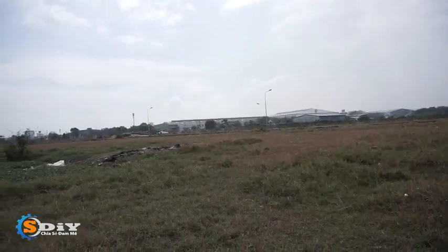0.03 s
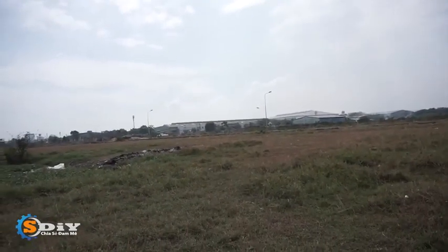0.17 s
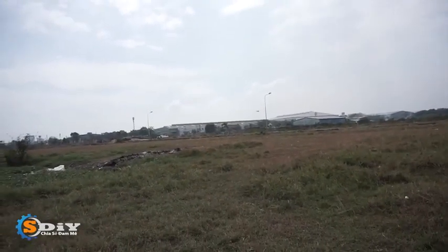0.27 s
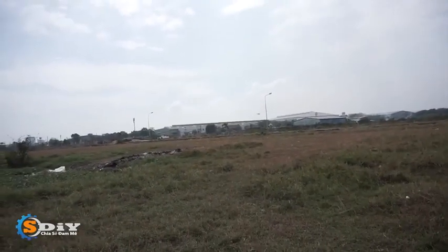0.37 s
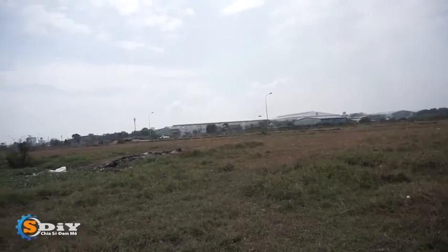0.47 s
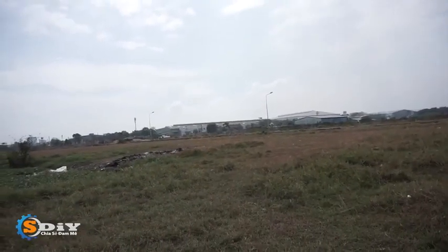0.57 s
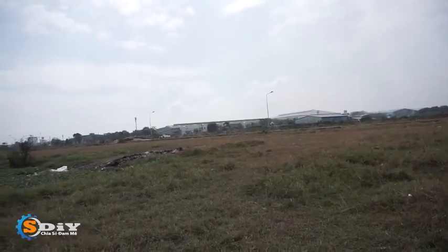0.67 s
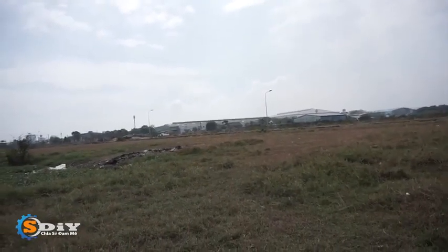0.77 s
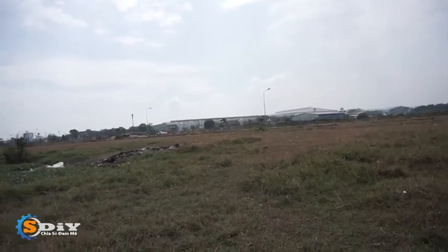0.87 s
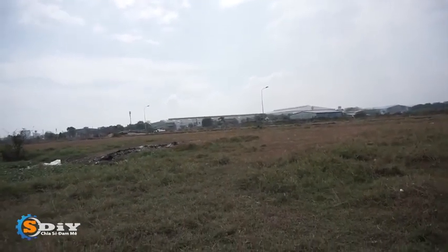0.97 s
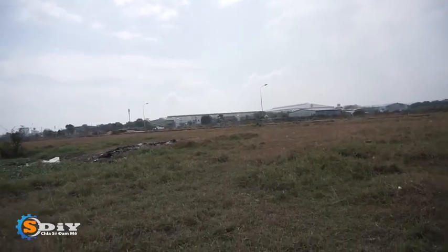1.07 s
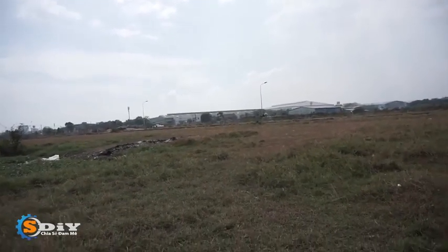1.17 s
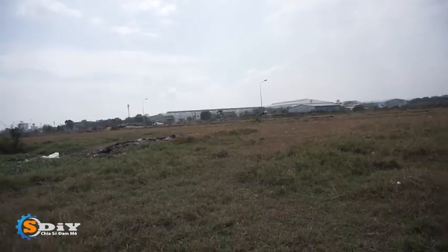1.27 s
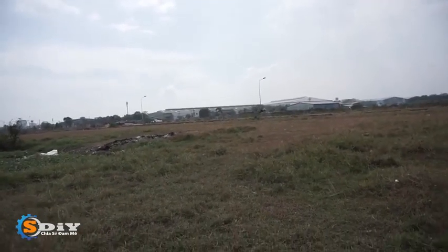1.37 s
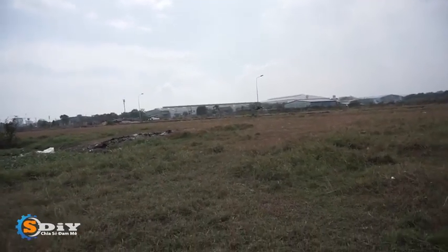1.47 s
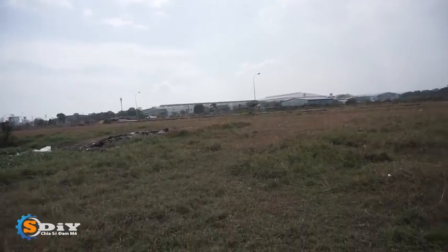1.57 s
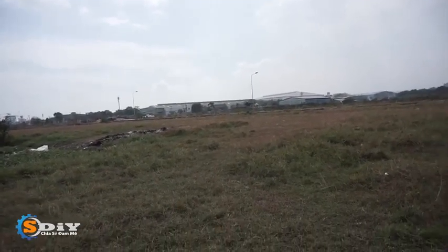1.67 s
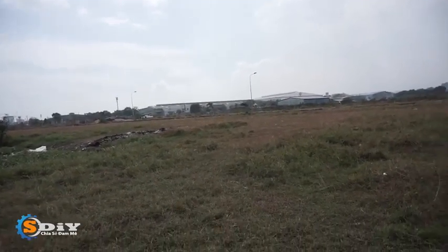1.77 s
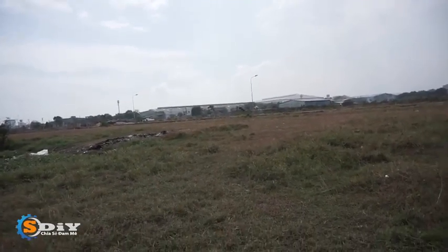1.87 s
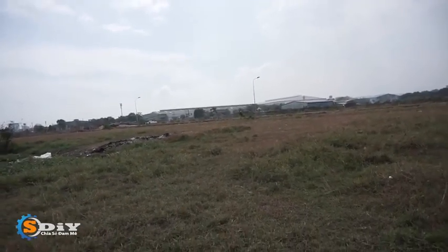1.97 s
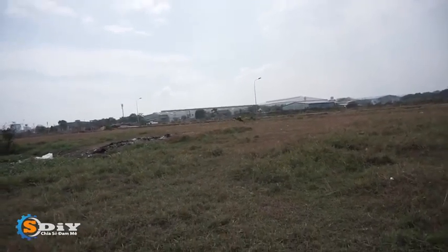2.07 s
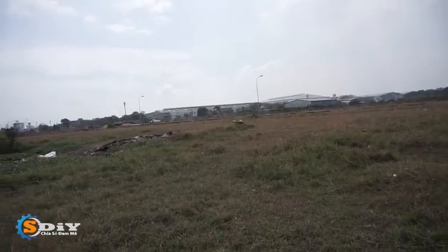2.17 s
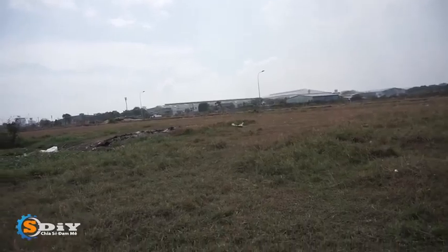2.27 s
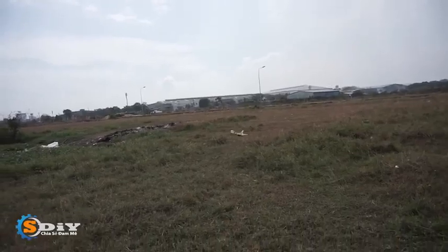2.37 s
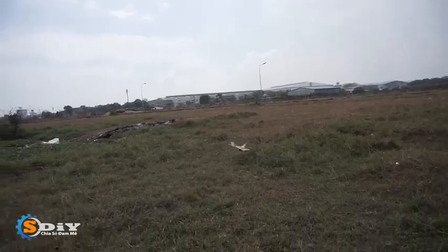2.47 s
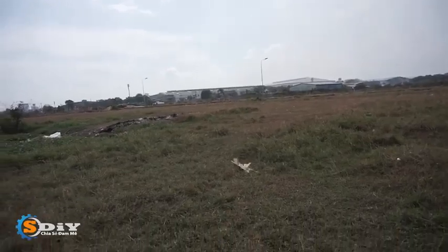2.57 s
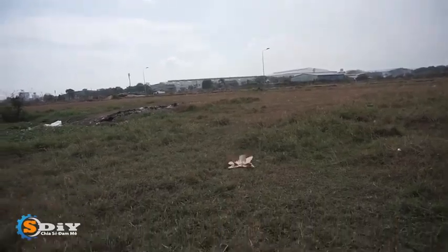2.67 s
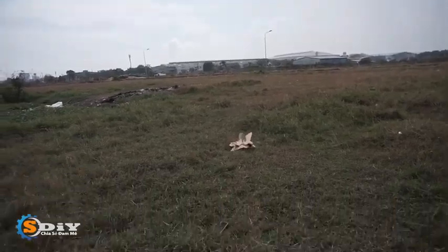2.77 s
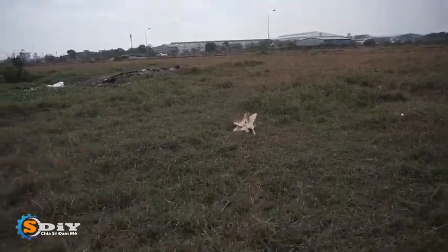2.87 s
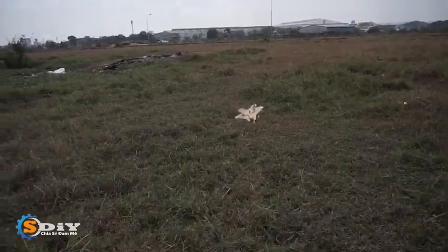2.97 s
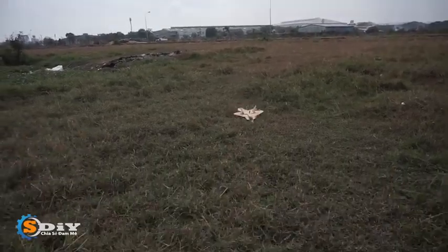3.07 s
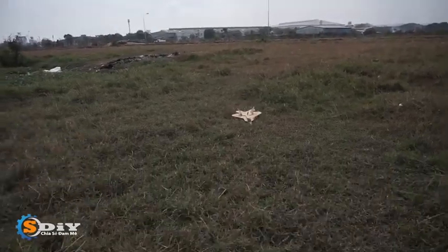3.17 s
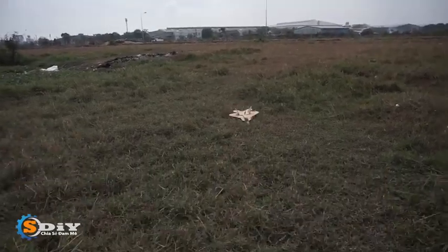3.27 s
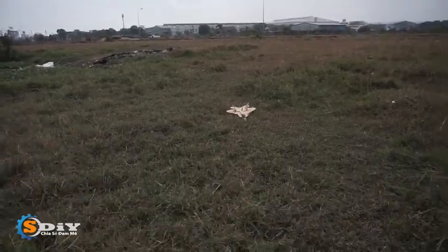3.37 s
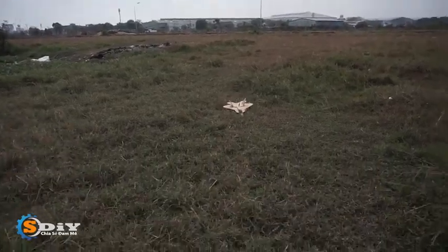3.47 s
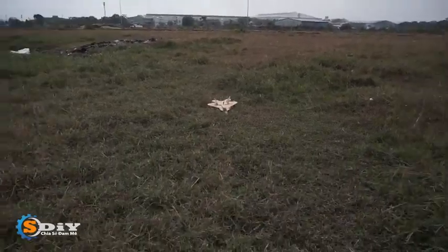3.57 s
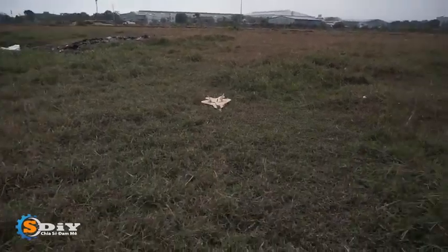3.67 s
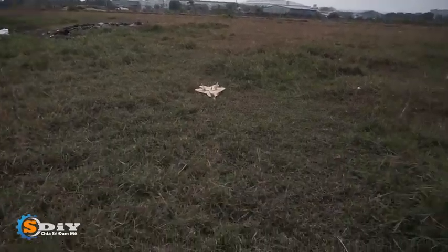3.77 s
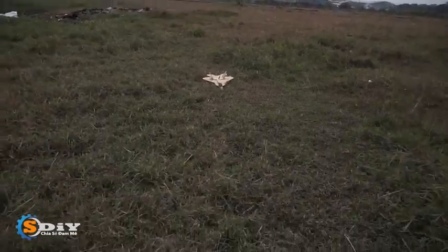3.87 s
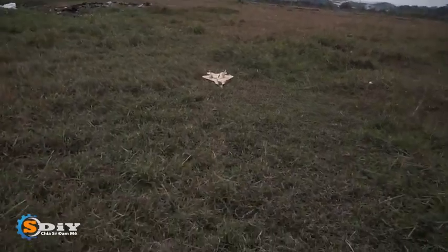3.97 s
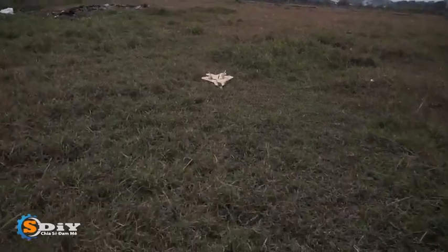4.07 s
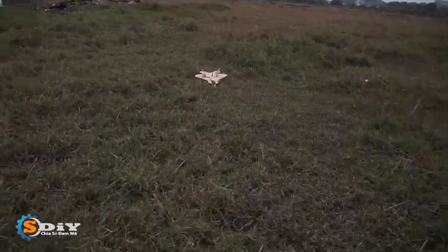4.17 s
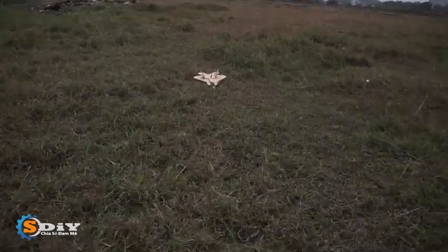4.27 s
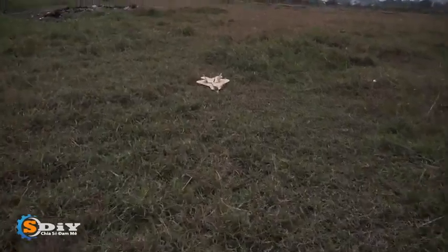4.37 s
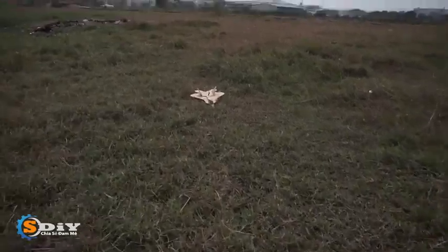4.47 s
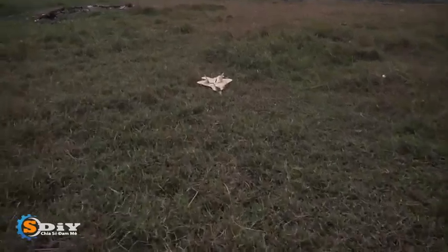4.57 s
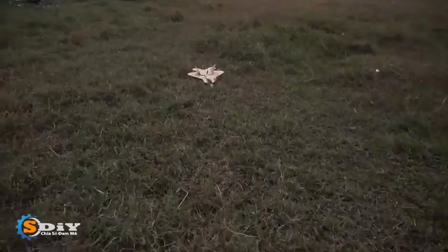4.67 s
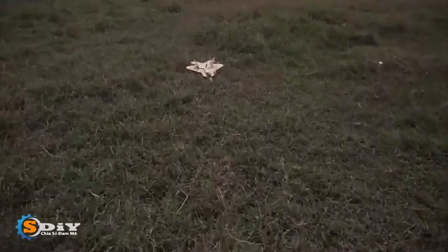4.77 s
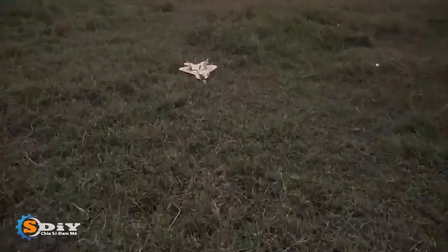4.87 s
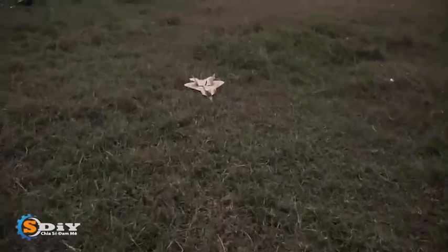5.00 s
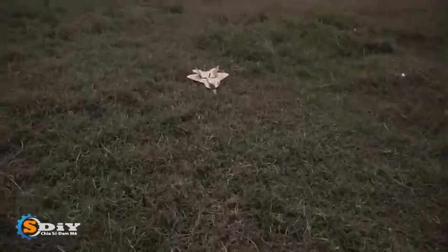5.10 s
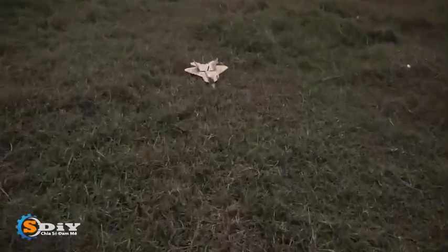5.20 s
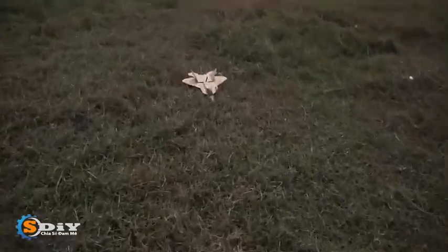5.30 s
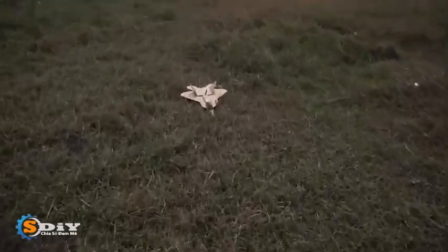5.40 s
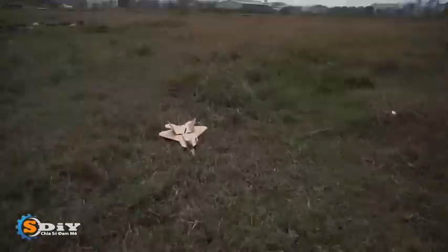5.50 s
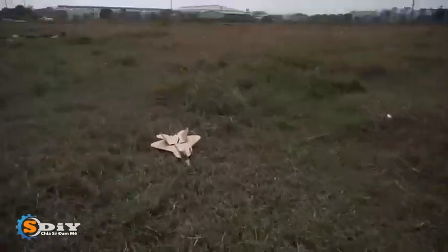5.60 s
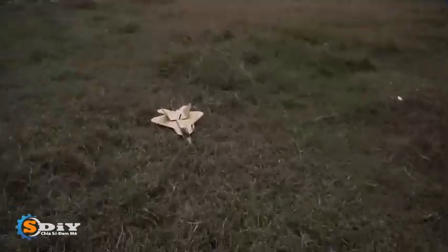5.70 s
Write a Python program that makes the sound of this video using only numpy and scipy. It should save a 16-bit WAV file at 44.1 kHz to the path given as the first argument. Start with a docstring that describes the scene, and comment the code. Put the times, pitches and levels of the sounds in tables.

```python
"""Open field with dry grass, stereo microphone: a faint background rush, a bush cricket buzzing in phrases to the left.
A small electric plane gives a burst of throttle (blade-pass harmonics over chopped noise), then glides in with a
falling whine. It skids into the grass (gated noise) with hollow knocks (struck resonances) and snapping stalks
(bright bursts). Someone then walks through the grass: swishes and treads of noise made of tiny cracks."""
import sys
import numpy as np
from scipy import signal
from scipy.fft import rfft, irfft, next_fast_len
from scipy.io import wavfile
from scipy.ndimage import map_coordinates

SR = 44100
rng = np.random.default_rng(int(sys.argv[2]) if len(sys.argv) > 2 else 0)


def master(y):
    """Save y as 16-bit WAV."""
    cut = np.clip(np.atleast_2d(y).T, -1, 1)
    pcm = np.round(cut * 32767)  # scale
    wavfile.write(sys.argv[1], SR, pcm.astype(np.int16))


N = 253134
T = np.arange(N) / SR  # time in seconds

# Colour of the open-air rush. Each row: frequency in Hz, relative level in dB.
AIR_COLOUR = [(15, -63), (25, -25), (120, -9.5), (200, -7.5), (256, -7), (335, -4), (463, -3), (591, 0),
              (1330, -4), (2220, -5.5), (2480, -5), (2690, -6.5), (10700, -13.5), (14000, -16.5),
              (16000, -21.5)]
# How alike the rush is in the two channels. Each row: frequency in Hz, likeness from -1 to 1.
AIR_ALIKE = [(60, 0.75), (150, 0.93), (380, -0.019), (950, -0.42), (2380, -0.095), (5980, -0.43),
             (15000, 0.37)]
# Cricket phrases. Each row: end in seconds, full level in dB, rasp relative to tone in dB, left over right in dB.
PHRASES = [(0.224, -45.5, -3.5, 8), (0.865, -44, -6.5, 7.5), (1.525, -42.5, -8, 7), (2.181, -42.5, -10, 7),
           (2.86, -41.5, -11, 10), (3.486, -37, -19, 17), (4.175, -38.5, -15, 16), (4.757, -48.5, -5, 7)]
# Colour of the cricket's rasp. Each row: frequency in Hz, relative level in dB.
RASP_COLOUR = [(9000, -63), (10000, -2), (10400, 13), (11200, 6), (11600, 6), (12800, -40)]
RASP_ALIKE = [(10000, 0.35)]  # Each row: frequency in Hz, likeness.
# The speed controller's switching tone.
# Each row: time in seconds, level in dB before SWITCHING_LIFT_DB is added.
SWITCHING = [(0.6, -78), (0.65, -61), (0.904, -41), (1.16, -55), (1.33, -40.5), (1.73, -66), (1.822, -53),
             (1.912, -65), (1.944, -54), (2.02, -76)]
# Propeller speed under throttle. Each row: time in seconds, blade-pass frequency in Hz.
SPEED = [(0.68, 334.3), (0.698, 357), (0.724, 434.4), (0.75, 494.1), (0.784, 541), (0.822, 567),
         (0.87, 586), (0.95, 598), (0.992, 576.5), (1.04, 554.3), (1.232, 560), (1.45, 558.3),
         (1.498, 536.6), (1.522, 508.6), (1.62, 393.5), (1.676, 352.3), (1.702, 342), (1.818, 330.9),
         (1.972, 272.2), (2.03, 243.6)]
# Blade tone at cruise speed. Each row: multiple of blade pass, relative level in dB.
HARMONICS = [(1, -10.5), (2, -11), (3, 0.5), (4, -7.5), (5, -6.5), (6, -10), (7, -9), (8, -13), (9, -11.5),
             (10, -16), (11, -24), (12, -20.5), (14, -22), (19, -18), (20, -30)]
# What the small disc radiates toward the ground, with no bass. Each row: frequency in Hz, gain in dB.
RADIATED = [(250, -27), (400, -37), (520, -8), (620, -2), (760, 0), (1100, 0.5), (1350, -5.5), (1650, -1),
            (2400, 1), (4000, -1.5), (4250, -5), (4500, -3.5), (4950, 0), (5300, -7.5), (6200, -5),
            (6700, -2.5)]
# Colour of the blades' air noise. Each row: frequency in Hz, relative level in dB.
WASH_COLOUR = [(300, -17), (700, -4.5), (1400, -2), (1950, -8), (2700, 5.5), (4000, -5.5), (5000, 0.5),
               (6300, -4), (8500, 6), (10000, 2.5), (13000, -4), (16000, -10)]
WASH_ALIKE = [(1000, 0.79), (12000, 0.22)]  # Each row: frequency in Hz, likeness.
# Grass hiss and foam scrape at speed. Each row: frequency in Hz, relative level in dB.
PLOUGH_HISS = [(2940, -35), (5000, -15.5), (7670, -9.5), (10100, 2), (11100, 1.5), (12300, -9),
               (14500, -11), (15200, -7), (16000, -20)]
PLOUGH_SCRAPE = [(210, -53), (350, -30), (471, -21), (577, -11.5), (758, -4.5), (950, -4.5), (1780, -4.5),
                 (1940, -5), (2130, -6), (2490, 1), (2940, -7.5), (3200, -3), (6000, -8.5), (7800, -45),
                 (13200, -120)]
# Grass hiss and foam scrape once slow. Each row: frequency in Hz, relative level in dB.
SLIDE_HISS = [(2940, -34), (5000, -14), (7240, -7), (7750, -3.5), (9550, 1.5), (11200, -3), (12000, -7.5),
              (15200, -7), (16000, -12)]
SLIDE_SCRAPE = [(88, -38), (150, -14), (189, -2), (278, -9), (315, -19), (611, -21), (747, -1),
                (1220, -16.5), (1540, -7), (2170, -2), (2650, -1), (3960, -4), (6000, -5.5), (7800, -27),
                (13200, -120)]
# How alike the skid is in the two channels. Each row: frequency in Hz, likeness.
GRASS_ALIKE = [(60, 0.99), (240, 0.68), (950, 1), (3770, 0.81), (15000, 0.14)]
# Lean of the skid across the stereo field. Each row: frequency in Hz, left over right in dB.
SKID_SIDE = [(700, 1), (2400, -6), (4400, 2), (9000, -0.5), (11000, 5.5), (13000, -10), (16000, 3)]
# The loudest dry stalks snapping, and the sharp crack of the hollow knock near 3.03 s. Each row: time in
# seconds, relative peak in dB, pitch in Hz, left over right in dB.
SNAPS = [(2.689, -18, 9900, 3), (2.7144, -18, 10350, -7), (2.895, -15, 10900, 2), (2.944, -14, 9466, -3),
         (3.032, -11.5, 4970, 1), (3.1264, -18, 10900, -3), (4.4324, -20, 12300, 8), (4.477, -6, 12100, 6),
         (4.503, -17, 12500, 5), (5.6308, -19, 12500, 6), (5.703, -19, 9000, 6), (5.7054, -7, 10500, 5)]
# The loudest hollow knocks, taps and footfalls.
# Each row: time in seconds, relative peak in dB, boost of the two lowest modes in dB, left over right in dB.
KNOCKS = [(2.75, -21, -13, 2), (3.0314, -21, -1.5, -16), (3.0364, -24, 6, 19), (3.687, -30.5, 0, -15),
          (4.479, -32, 7, 6), (4.664, -40, 7, 5), (4.748, -41.5, 23, 1), (5.647, -36, -1, 2),
          (5.6936, -27.5, -21, -8)]
# Hollow resonances. Each row: frequency in Hz, width in Hz, relative level in dB.
KNOCK_MODES = [(377, 210, 6), (850, 185, 7.5), (1920, 220, 6.5), (2570, 120, 11.5), (2754, 330, 3.5),
               (3340, 810, -3), (5100, 1700, -15.5)]
# Sweeps of a leg or foot through the grass.
# Each row: start in seconds, length in seconds, swish level in dB, tread level in dB, growth over the sweep in dB.
STEPS = [(4.282, 0.21, -31.5, -48, 8.5), (4.538, 0.19, -50, -56, -6), (4.944, 0.12, -35.5, -49, 1),
         (5.137, 0.078, -41, -51.5, 4), (5.288, 0.12, -51, -58, -0.5), (5.46, 0.16, -34.5, -48, 8),
         (5.645, 0.083, -48, -53, -5.5)]
# Colours of legs brushing blades and soles crushing stems. Each row: frequency in Hz, relative level in dB.
SWISH = [(2940, -49), (5000, -39), (6440, -35), (6960, -17), (7940, -12.5), (9010, -7), (12500, 1),
         (15100, -5), (16000, -11.5)]
TREAD = [(120, -44), (200, -12), (295, -9.5), (343, -23), (384, -8.5), (550, -3), (1030, -7.5),
         (1580, -5.5), (2530, -5.5), (5500, -15.5), (7150, -15), (12100, -120)]
# How alike the steps are in the two channels. Each row: frequency in Hz, likeness.
STEP_ALIKE = [(300, 0.63), (2000, 0.54), (12000, 0)]

AIR_DB = -48
QUIETER_S, QUIETER_DB, RETURN_S = 0.28, 5.5, 0.44  # the background rush is quieter from here and slowly returns
PHRASE_S = 0.47  # length of a cricket phrase
SWITCHING_HZ, SWITCHING_LIFT_DB = 8207, 4
# The motor winding down on the glide: start, end, first pitch, time to half speed
WHINE_START_S, WHINE_END_S, WHINE_HZ, WHINE_HALF_S = 2.132, 2.715, 5754, 0.84
WHINE_DB, APPROACH_DB_PER_S = -42.5, 46  # level on arrival, growth as the plane nears
CRUISE_HZ = 559  # blade pass
TONE_DB, WASH_DB = -30, -39  # reference levels of blade tone and air noise at cruise speed
# Growth with speed: first two harmonics, the others, air noise
LOW_DB_PER_OCTAVE, HIGH_DB_PER_OCTAVE, WASH_DB_PER_OCTAVE = 9, 19, 12
SLOW_ROUGH_DB_PER_OCTAVE = 2.5  # a slow, windmilling propeller flutters more
BUILD_DB, BUILD_S = 16, 0.21  # the tone starts this much weaker and builds as the plane picks up
CREST_S, CREST_DB, CREST_WIDTH_S = 1.324, 1.5, 0.087  # the tone swells once more mid-burst
# Throttle shut: time to half speed, when it is no longer heard, its fade
PROP_HALF_S, PROP_GONE_S, PROP_FADE_S = 1.65, 2.536, 0.41
TOUCHDOWN_S, PLOUGH_S, STOP_S = 2.711, 0.037, 3.18  # the belly bites, ploughs this long, slides until it stops
PLOUGH_HISS_DB, PLOUGH_SCRAPE_DB, SLIDE_HISS_DB, SLIDE_SCRAPE_DB = -20.5, -27, -37.5, -45.5
STEP_RISE_DB_PER_S, STEP_FALL_DB_PER_S, STEP_SIDE_DB = 420, 184, 8.5
TOP_HZ = 15950


def amp(db):
    """Decibels to gain."""
    return 10 ** (np.asarray(db) / 20)


def unit(x):
    """Scaled to rms 1."""
    return x / np.sqrt(np.mean(x ** 2) + 1e-20)


def along(points, hz):
    """Value at a frequency, read between (Hz, value) points on a log axis."""
    f, v = np.transpose(points)
    return np.interp(np.log(hz + 1), np.log(f + 1), v)


def curves(rows):
    """One value per sample for each column after the time."""
    s, *cols = np.transpose(rows)
    return [np.interp(T, s, c) for c in cols]


def during(rows):
    """1 over a table's time span, fading within 20 ms outside it."""
    outside = np.minimum(T - rows[0][0], rows[-1][0] - T)
    return np.clip(1 + outside / .02, 0, 1)


def wobble(rate):
    """A smooth random curve, rate knots a second."""
    knots = rng.standard_normal(int(N * rate / SR) + 4)
    return map_coordinates(knots, [T * rate])


def turns_of(hz):
    """Running phase, in radians, of a frequency curve."""
    return 2 * np.pi * np.cumsum(hz) / SR


def swell(start, length, growth_db, rise_db_per_s, fall_db_per_s):
    """Envelope that rises until start, changes by growth_db to gain 1 over its length, then dies away."""
    held = np.clip((T - start) / length, 0, 1)
    before = np.maximum(start - T, 0)
    after = np.maximum(T - start - length, 0)
    return amp(growth_db * (held - 1) - rise_db_per_s * before - fall_db_per_s * after)


def coasting(start, half_s):
    """Share of its speed that a rotor keeps while air drag slows it."""
    return 1 / (1 + np.maximum(T - start, 0) / half_s)


def panned(x, balance_db):
    """Left and right at constant power; a positive balance leans left."""
    g = np.array([amp(balance_db / 2), amp(-balance_db / 2)]).reshape(2, -1)
    return x * g / np.sqrt(np.mean(g ** 2, axis=0))


def filtered(x, response):
    """x passed through a complex response of frequency."""
    m = next_fast_len(N + SR // 4)
    hz = np.fft.rfftfreq(m, 1 / SR)
    return irfft(rfft(x, m) * response(hz), m)[..., :N]


def arriving(x, lead_ms):
    """The sound reaches the left microphone first by lead_ms, or the right one if negative."""
    sides = np.array([[1], [-1]])
    return filtered(x, lambda hz: np.exp(1j * np.pi * hz * lead_ms / 1000 * sides))


def rush(colour, alike, gate=1):
    """Stereo noise of rms 1, gated and then coloured; mid and side shares set the channels' likeness."""
    def shape(hz):
        turn = np.arccos(np.clip(along(alike, hz), -1, 1)) / 2
        return amp(along(colour, hz)) * np.array([np.cos(turn), np.sin(turn)])

    mid, side = filtered(gate * rng.standard_normal((2, N)), shape)
    return unit(np.array([mid + side, mid - side]))


def grains(rate, spread_db, life):
    """Envelope of many tiny cracks of uneven size: rate per second, energy decay time life in seconds."""
    cracks = rng.random(N) < rate / SR
    size = amp(spread_db * np.clip(rng.standard_normal(N), -2, 2))
    energy = signal.lfilter([1], [1, -np.exp(-1 / (life * SR))], cracks * size ** 2)
    return np.sqrt(energy)


def field():
    """Faint open-air rush: coloured noise, slightly restless, that turns quieter early on and slowly returns."""
    quieter = np.interp(T, [QUIETER_S - .03, QUIETER_S, QUIETER_S + RETURN_S], [0, 1, 0])
    level_db = AIR_DB - QUIETER_DB * quieter + 0.45 * wobble(6.6)
    return amp(level_db) * rush(AIR_COLOUR, AIR_ALIKE)


def cricket(stroke_hz=141.7, wing_hz=11150, sag_hz=1150, swell_db=17, swell_time=0.28):
    """Each wing stroke is a short tone that sags as the wing slows; a phrase swells and stops dead."""
    strokes = np.cumsum(stroke_hz * (1 + .01 * wobble(25))) / SR
    index, u = strokes.astype(int), strokes % 1  # which stroke, and how far through it
    chance = rng.standard_normal((2000, 3))[index]  # each stroke's own pitch, phase and level
    hz = wing_hz + 16 * chance[:, 0] + 25 * wobble(900) - sag_hz * u ** 4
    phase = turns_of(hz) + 0.5 * chance[:, 1]
    stroke = np.sin(np.pi * u) ** 2 * amp(0.71 * chance[:, 2])
    tone = unit(stroke * np.sin(phase))
    trailing = np.roll(stroke, SR // 500)  # the rasp trails each stroke by 2 ms
    rasp = rush(RASP_COLOUR, RASP_ALIKE, trailing + 0.27)
    out = np.zeros((2, N))
    for end, db, rasp_db, balance_db in PHRASES:
        start = end - PHRASE_S
        rising = np.clip(1 - (T - start) / swell_time, 0, 1)
        gate = np.clip(np.minimum(T - start, end - T) / 0.0077, 0, 1)
        level = gate * amp(db - swell_db * rising ** 2)
        out += panned((tone + amp(rasp_db) * rasp) * level, balance_db)
    return arriving(out, lead_ms=0.06)


def motor():
    """The controller's switching tone under throttle, then the coasting motor's whine, falling and coming nearer."""
    switching_level = amp(curves(SWITCHING)[0] + SWITCHING_LIFT_DB) * during(SWITCHING)
    switching = switching_level * np.sin(2 * np.pi * SWITCHING_HZ * T)
    hz = WHINE_HZ * coasting(WHINE_START_S, WHINE_HALF_S) * (1 + 0.0021 * wobble(83))
    glide_s = WHINE_END_S - WHINE_START_S
    nearing = swell(WHINE_START_S, glide_s, APPROACH_DB_PER_S * glide_s, rise_db_per_s=202, fall_db_per_s=900)
    whine = amp(WHINE_DB + 2.2 * wobble(34.85)) * nearing * np.sin(turns_of(hz))
    return panned(switching, -1.1) + panned(whine, -1.2)


def propeller(scatter=1.0, balance_db=-3.0):
    """Blade passages make fluttering harmonics over wash chopped by the blades; both grow with speed."""
    throttle_on, coast_start = SPEED[0][0], SPEED[-1][0]
    hz = curves(SPEED)[0] * coasting(coast_start, PROP_HALF_S)
    octaves = np.log2(hz / CRUISE_HZ)
    fade_in = np.clip((T - throttle_on) / 0.022 + 1, 0, 1)
    fade_out = np.clip((PROP_GONE_S - T) / PROP_FADE_S, 0, 1)
    lag_db = BUILD_DB * np.exp(-np.maximum(T - throttle_on, 0) / BUILD_S)
    crest_db = CREST_DB * np.exp(-.5 * ((T - CREST_S) / CREST_WIDTH_S) ** 2)
    phase = turns_of(hz * (1 + 0.000934 * wobble(58.6) + 0.0019 * wobble(500)))
    tone = np.zeros(N)
    for k, db in HARMONICS:
        k = round(k)
        growth = LOW_DB_PER_OCTAVE if k < 3 else HIGH_DB_PER_OCTAVE
        level_db = TONE_DB + db - lag_db + crest_db + octaves * growth
        # turbulence shakes short waves most
        flutter_db = np.sqrt(k) * (0.62 * wobble(11) + 0.45 * wobble(120))
        flutter_db += SLOW_ROUGH_DB_PER_OCTAVE * octaves * wobble(90)
        drift = scatter * wobble(2.2) * k / (k + 4)  # each harmonic's phase drifts slowly, softening the pulse
        gain = amp(level_db + flutter_db + along(RADIATED, k * hz))
        tone += gain * np.sin(k * phase + drift)
    tone *= 1 + .07 * np.cos(phase / 2) + .05 * wobble(700)  # unequal blades and gusty inflow roughen the note
    wash_db = WASH_DB + WASH_DB_PER_OCTAVE * octaves - 0.25 * lag_db
    chopping = 1 + 0.26 * np.cos(phase)
    wash = amp(wash_db) * rush(WASH_COLOUR, WASH_ALIKE, chopping)
    return arriving(panned(fade_in * fade_out * (tone + wash), balance_db), lead_ms=-0.024)


def skid():
    """The belly ploughs into crackling dry stalks that scrape the foam, then slides on, quieter and darker."""
    touching = np.clip((T - 2.686) / .002, 0, 1)
    stalks = grains(rate=6000, spread_db=3.5, life=.0005)
    scuffs = grains(rate=4000, spread_db=3, life=.0009)

    bite = swell(TOUCHDOWN_S, PLOUGH_S, growth_db=-0.5, rise_db_per_s=800, fall_db_per_s=173)
    plough = amp(PLOUGH_HISS_DB) * bite * rush(PLOUGH_HISS, GRASS_ALIKE, stalks)
    bite = swell(TOUCHDOWN_S, PLOUGH_S, growth_db=5, rise_db_per_s=800, fall_db_per_s=200)
    plough += amp(PLOUGH_SCRAPE_DB) * bite * rush(PLOUGH_SCRAPE, GRASS_ALIKE, scuffs)

    start = TOUCHDOWN_S + PLOUGH_S
    drag = swell(start, STOP_S - start, growth_db=7.5, rise_db_per_s=500, fall_db_per_s=111)
    slide = amp(SLIDE_HISS_DB) * drag * rush(SLIDE_HISS, GRASS_ALIKE, stalks)
    drag = swell(start, STOP_S - start, growth_db=2.5, rise_db_per_s=500, fall_db_per_s=71)
    slide += amp(SLIDE_SCRAPE_DB) * drag * rush(SLIDE_SCRAPE, GRASS_ALIKE, scuffs)
    slide *= amp(1.7 * wobble(35))  # the tufts are uneven
    return filtered(touching * (plough + slide), lambda hz: panned(1, along(SKID_SIDE, hz)))


def snaps(width=0.22):
    """A breaking stalk, or the crack of a knock, gives a very short bright burst around its own pitch; width is
    in log frequency."""
    out, t = np.zeros((2, N + SR)), np.arange(1024) / SR
    f = np.fft.rfftfreq(len(t), 1 / SR)
    fade = amp(-60 * t / .0045)
    for s, db, hz, balance_db in SNAPS:
        band = np.exp(-.5 * (np.log((f + 1) / hz) / width) ** 2) + 0.064 * f / hz
        burst = irfft(rfft(rng.standard_normal((2, len(t)))) * band) * fade
        burst *= amp(db - 3) / np.abs(burst).max()
        out[:, round(s * SR):][:, :len(t)] += panned(burst, balance_db)
    return filtered(out[:, :N], lambda hz: hz ** 2 / (hz ** 2 + 3000 ** 2))  # little bass


def knocks(rattle_db=-24, lowest_hz=230):
    """A blow and its brief rattle drive a few well-damped hollow resonances."""
    out, t = np.zeros((2, N + SR)), np.arange(4096) / SR
    f = np.fft.rfftfreq(len(t), 1 / SR)
    fade = amp(-60 * t / .018)
    no_bass = (1j * f / (lowest_hz + 1j * f)) ** 2
    for s, db, thump_db, balance_db in KNOCKS:
        body = 0
        for k, (centre, width, level) in enumerate(KNOCK_MODES):
            mode = 1j * f * width / (centre * centre - f * f + 1j * f * width)
            body = body + (-1) ** k * amp(level + thump_db * (k < 2)) * mode
        blow = (t == 0) + amp(rattle_db) * fade * rng.standard_normal((2, len(t)))
        ring = irfft(rfft(blow) * body * no_bass)
        ring *= amp(db + 2.0) / np.abs(ring).max()
        out[:, round(s * SR):][:, :len(t)] += panned(ring, balance_db)
    return out[:, :N]


def squeak(at=3.112, length=0.011, squeak_hz=2770, level_db=-43):
    """Foam slipping over a stalk gives one small rough chirp."""
    slip = np.exp(-.5 * ((T - at) / length) ** 2)
    phase = turns_of(squeak_hz * (1 + 0.032 * wobble(700)))
    return panned(amp(level_db + 4.6 * wobble(400)) * slip * np.sin(phase), 0)


def steps():
    """Legs swish through the grass and soles crush it; each sweep rises quickly, swells or ebbs, and dies away."""
    swish, tread = np.zeros((2, N))
    for start, length, swish_db, tread_db, growth_db in STEPS:
        sweep = swell(start, length, growth_db, STEP_RISE_DB_PER_S, STEP_FALL_DB_PER_S)
        swish = np.maximum(swish, amp(swish_db) * sweep)
        tread = np.maximum(tread, amp(tread_db) * sweep)
    blades = grains(rate=3500, spread_db=4, life=.0006)
    stems = grains(rate=800, spread_db=3.5, life=.0014)
    tread = tread * amp(1.7 * wobble(45))  # stems give way unevenly
    brushing = swish * rush(SWISH, STEP_ALIKE, blades)
    crushing = tread * rush(TREAD, STEP_ALIKE, stems)
    return panned(brushing, STEP_SIDE_DB) + panned(crushing, 0.92)


def scene():
    """Air, insect, plane, landing and walk in the open field."""
    flight = motor() + propeller()
    landing = skid() + snaps() + knocks() + squeak()
    return field() + cricket() + flight + landing + steps()


def record(dry):
    """The microphone keeps nothing above its band limit."""
    return filtered(dry, lambda hz: hz < TOP_HZ)


dry = scene()
out = record(dry)
master(out)
```